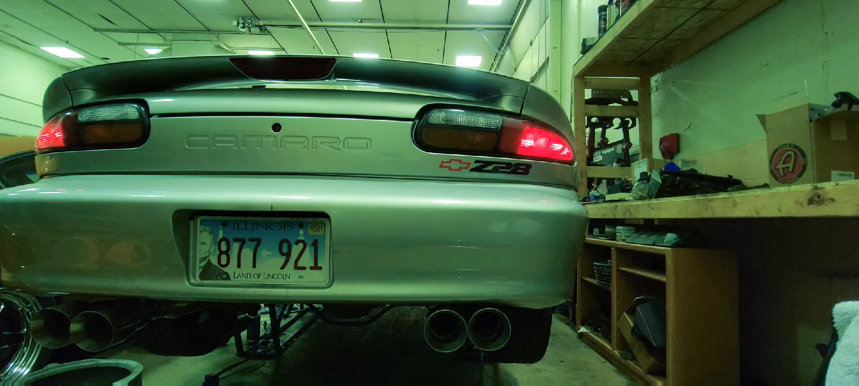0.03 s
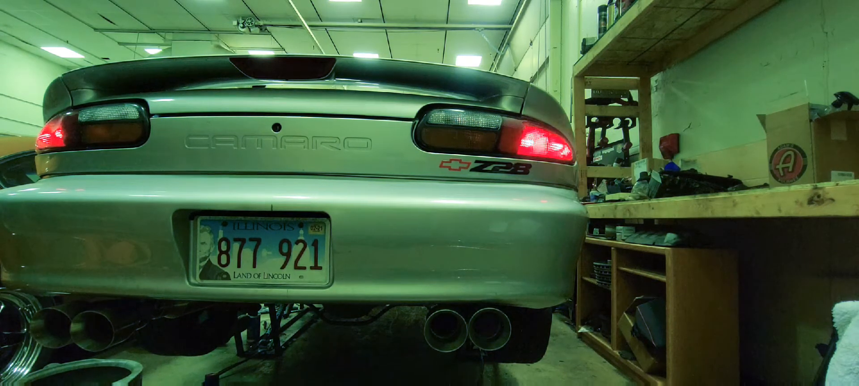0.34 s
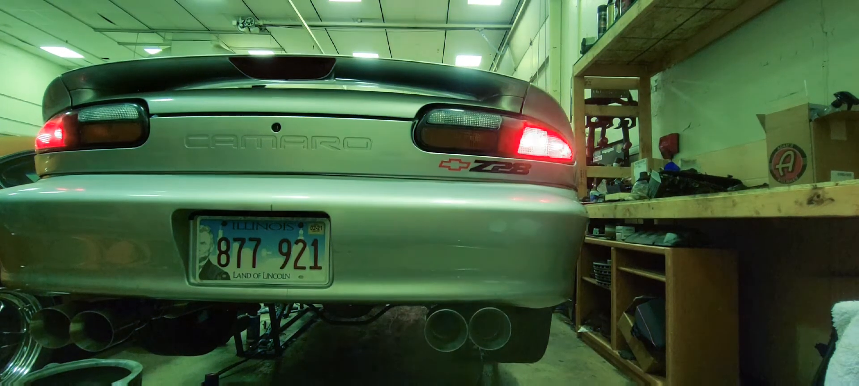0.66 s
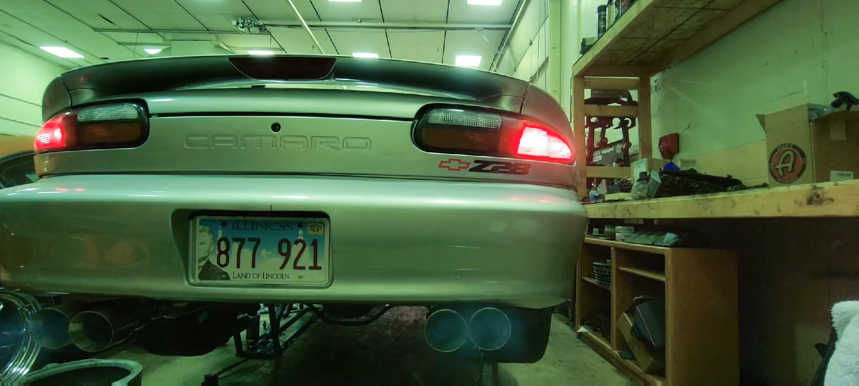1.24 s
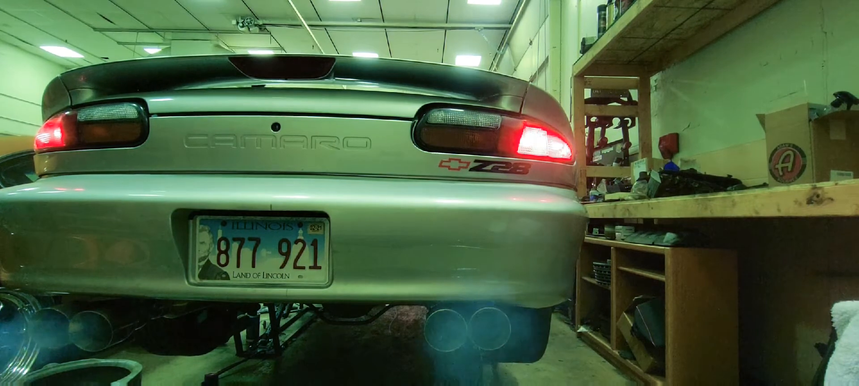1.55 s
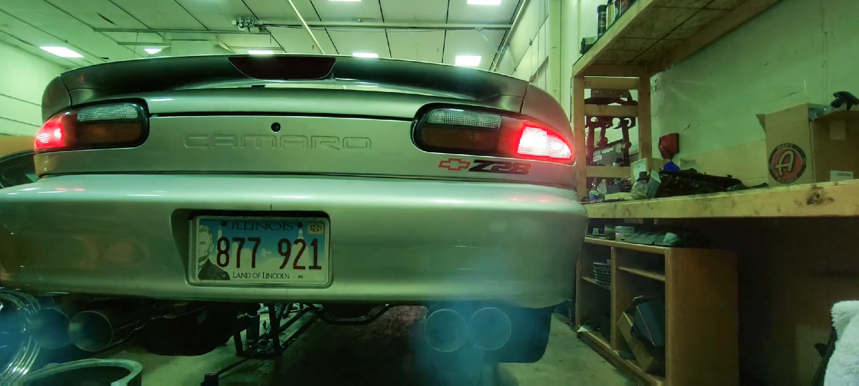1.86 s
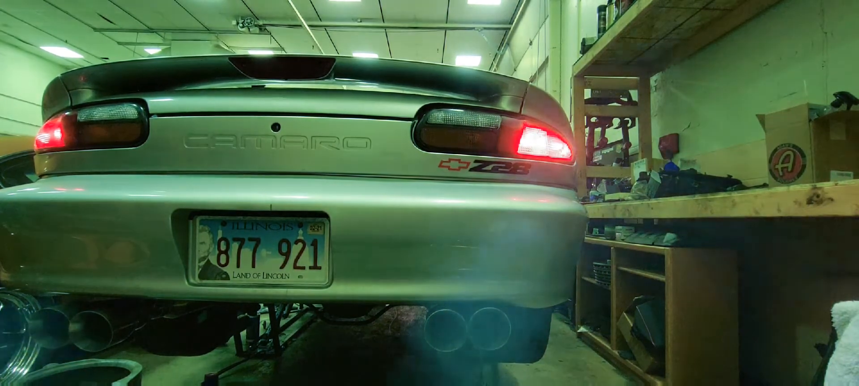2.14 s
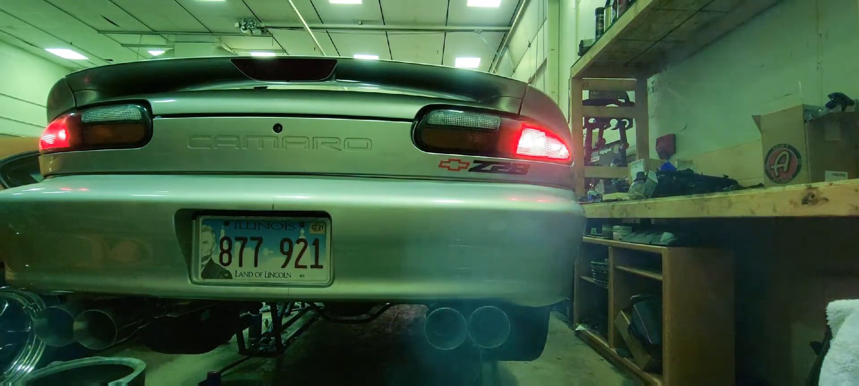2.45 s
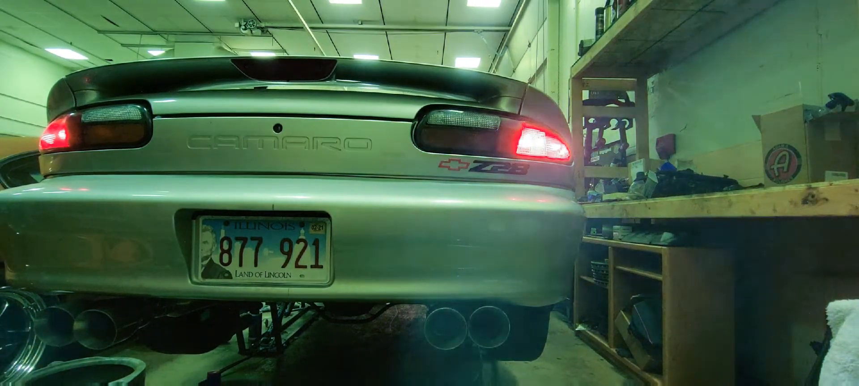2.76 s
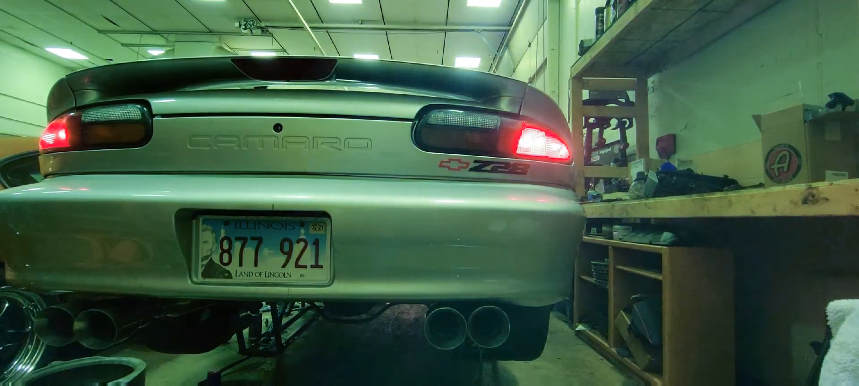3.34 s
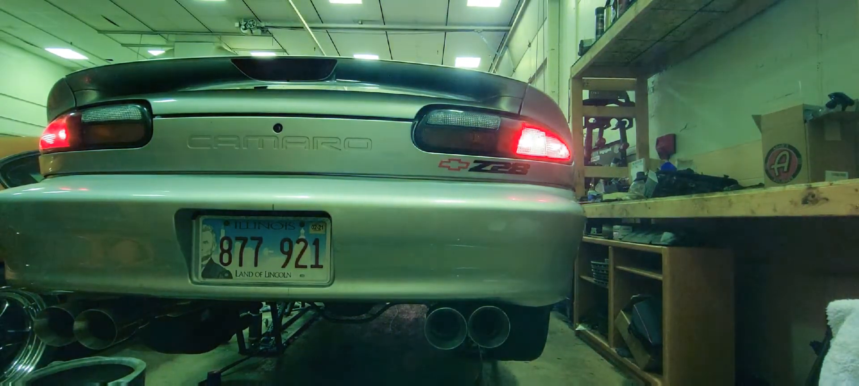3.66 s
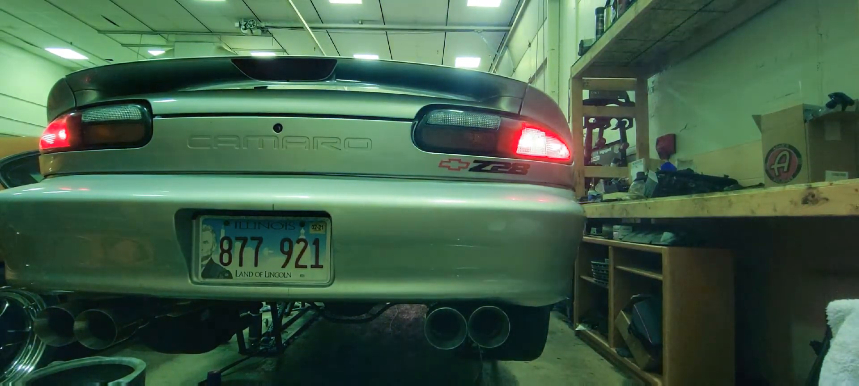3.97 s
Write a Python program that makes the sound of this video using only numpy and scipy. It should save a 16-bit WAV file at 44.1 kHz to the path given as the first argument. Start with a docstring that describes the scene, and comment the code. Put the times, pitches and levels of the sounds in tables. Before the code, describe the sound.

A V8 car engine starts: the starter grinds and knocks briefly, the engine catches with a thump and pops, revs up, then sinks to a lumpy idle. The microphone is just behind the tailpipes in a workshop.

```python
"""A V8 starting in a workshop, with a stereo microphone just behind its twin tailpipes.
The starter grinds and knocks; the engine catches with a thump, flares, sags and settles to a lumpy idle.
Each firing sends a pressure pulse and a puff of gas down the pipes, which boom, bark, rasp and hiss,
with a few pops, spits and thin chirps at the mouths. The room adds a short tail; the left is louder."""
import sys
import numpy as np
from scipy import signal
from scipy.fft import rfft, irfft, next_fast_len
from scipy.io import wavfile
from scipy.ndimage import uniform_filter1d, map_coordinates

SR = 44100
rng = np.random.default_rng(int(sys.argv[2]) if len(sys.argv) > 2 else 0)


def pcm_store(signal):
    """Save signal as 16-bit PCM."""
    levels = np.round(np.clip(np.atleast_2d(signal), -1, 1) * 32767)
    wavfile.write(sys.argv[1], SR, levels.astype(np.int16).T)


N = 176400

# engine speed, eight firings a cycle: time_s, cycle_rate_hz
ENGINE_SPEED = [(.4, 6.24), (.5, 11.2), (.6, 13.01), (.72, 16.22), (.86, 18.38), (1.02, 19.12),
                (1.16, 18.84), (1.4, 17.78), (1.6, 16.43), (1.76, 15.83), (1.88, 13.7), (2, 11.78),
                (2.12, 9.54), (2.28, 8.19), (2.45, 8), (2.65, 8.8), (2.87, 9.42), (3.06, 10.45),
                (3.3, 10.27), (3.6, 9.93), (4, 9.78)]
# cylinders in firing order: strength_db, late_ms
FIRING_ORDER = [(1, 1.05), (-3.6, .5), (1.3, .35), (0, 0), (-3.6, -1.55), (1.2, .65), (2, -.95), (2.5, .1)]
# level of the pipes' resonances: time_s, boom_db, bark_db
PIPE_LEVELS = [(.41, -16, -20.5), (.52, -7.5, -13), (.62, -13.5, -14), (.72, -13.5, -13),
               (.84, -18.5, -13.5), (1.1, -18.5, -14.5), (1.42, -19, -14), (1.57, -17, -16),
               (1.84, -15.5, -14.5), (1.98, -9.5, -18), (2.04, -12.5, -21), (2.09, -14, -19.5),
               (2.35, -17.5, -25), (2.5, -16, -23.5), (2.71, -13.5, -18), (3.1, -13.5, -20),
               (3.41, -14, -19), (4, -15.5, -18)]
# the pipes' long resonances, with dead notches between them: freq_hz, gain_db
BOOM_RESPONSE = [(12, -60), (30, -37), (42, -4), (52, -2.5), (64, -7.5), (80, -5.5), (96, 6.5), (108, 0.5),
                 (120, -14), (134, -5.5), (150, -18), (172, -27), (193, -12.5), (212, -20.5), (280, -54),
                 (1000, -100)]
# the tailpipes' ring: freq_hz, gain_db
BARK_RESPONSE = [(100, -68), (175, -37.5), (215, -17.5), (245, -12), (277, -5.5), (303, -12), (336, -3),
                 (356, -2.5), (379, 2), (402, -2.5), (435, -12), (470, -8), (500, -12), (528, -13),
                 (600, -23), (800, -36), (3000, -109)]
# level of the gas rushing from the mouths: time_s, rasp_db, hiss_db
GAS_LEVELS = [(.41, -32.5, -26.5), (.47, -22.5, -28), (.62, -23.5, -32), (.85, -28, -40), (1.2, -30, -41.5),
              (1.75, -31, -39.5), (1.89, -30, -34.5), (1.98, -33.5, -39.5), (2.35, -35, -39.5),
              (2.6, -27.5, -32.5), (2.8, -29.5, -32), (3.3, -29, -33), (4, -31, -34)]
# colour of that gas, low rasp and high hiss: freq_hz, density_db
RASP_SPECTRUM = [(300, 1.5), (560, -7), (650, -8), (740, 0.5), (860, 2), (1050, -4), (1320, -7.5),
                 (1650, -23), (2200, -23), (4000, -30)]
HISS_SPECTRUM = [(900, -22), (1900, -6.5), (2250, -31), (2650, -2.5), (3400, -12), (4600, 2), (5400, 0),
                 (6600, 6.5), (8300, -6), (11500, -8), (14000, 1), (16000, -6)]
# pops of the first firings, sharp spits, thin chirps at idle: start_s, level_db
POP_EVENTS = [(.427, -10), (.446, -9), (.478, -11), (.561, -17), (.593, -14.5), (.616, -12)]
SPIT_EVENTS = [(.404, -24), (0.451, -17), (1.4946, -31), (1.6081, -11)]
CHIRP_EVENTS = [(2.9, -36), (3.1, -32.5), (3.395, -36), (3.6, -32), (3.705, -35), (3.805, -33)]
# colour of each kind of gas burst: freq_hz, density_db
POP_SPECTRUM = [(250, -5), (600, -3.5), (900, -2.5), (1400, -11), (2000, -22), (5000, -45), (14000, -44)]
SPIT_SPECTRUM = [(30, 37), (300, 29.5), (1200, 18), (3000, -1), (6500, 2), (9000, -19), (15000, -10)]
CHIRP_SPECTRUM = [(7000, -39), (9300, -6), (10000, -1), (10800, -11), (13000, -9), (16000, -15)]
# the starter's grind and a low throb that peaks as the engine catches: time_s, grind_db, throb_db
START_LEVELS = [(0, -27.5, -54), (.05, -26.5, -31), (.165, -29, -45), (.185, -20, -40), (.235, -25, -28),
                (.315, -25, -30), (.335, -18.5, -30), (.395, -18, -23), (.43, -29, -7), (.48, -30.5, -20),
                (.6, -38, -57), (.75, -53, -75), (1.1, -80, -91)]
# colour of the grinding gears: freq_hz, density_db
GRIND_SPECTRUM = [(20, -27), (50, -4), (150, -20.5), (420, -11), (520, -11), (640, -17.5), (900, -12),
                  (1100, -13), (1350, -12), (1700, -19.5), (2100, -19.5), (2650, -14), (3400, -22.5),
                  (4200, -19.5), (4630, -24.5), (5200, -23.5), (6400, -20.5), (8400, -38), (15000, -51.5)]
# the starter housing's narrow rings: pitch_hz, half_width_hz, level_db
HOUSING_MODES = [(1304, 35, 1), (1480, 32, -12), (2530, 76, -2.5), (4690, 210, -4)]
# knocks of the starter drive: start_s, level_db
DRIVE_KNOCKS = [(0.061, -22), (0.179, -32), (0.325, -9)]
# the drive's ring after a knock: pitch_hz, level_db, t60_s
DRIVE_MODES = [(523, 2.5, 0.1), (534, -17, 0.11), (1456, -15, 0.077)]
# the workshop's decay: freq_hz, t60_s
ROOM_DECAY = [(100, 0.94), (500, 0.31), (3000, 0.18), (12000, 0.056)]
# room tail against direct sound at the microphone: freq_hz, level_db
ROOM_SHARE = [(100, -22), (190, -22), (370, -13), (700, -5), (3000, -4.5), (14000, -3)]
# left channel over right: freq_hz, difference_db
LEFT_OVER_RIGHT = [(60, .5), (130, .5), (300, 4.5), (600, 4.8), (1000, 3.5), (2000, 4.8), (8000, 6),
                   (13000, 1.8)]

CATCH_S, CATCH_FADE_S = .406, .0084
BARK_LEFT_LAG_S = .00032
COMPRESSION_HZ, THROB_HZ, MESH_HZ = 6.9, 59.97, 1365
WHINE_GAIN, WHINE_BEND, WHINE_SWELL_DB = .42, .0513, 1.5
HOUSING_DB = -5
TOP_HZ = 15800


def exhaust():
    """Firing pulses boom and bark in the pipes; their gas rasps and hisses at the mouths."""
    boom_db, bark_db = curves(PIPE_LEVELS)
    rasp_db, hiss_db = curves(GAS_LEVELS)
    running = np.clip((np.arange(N) / SR - CATCH_S) / CATCH_FADE_S + .5, 0, 1)
    thuds = pulses(uneven=1, stagger=1, scatter_db=.7, jitter=.02)
    boom = even(pipe(unit(thuds) + .14 * rng.standard_normal(N), BOOM_RESPONSE))
    fronts = pulses(uneven=1, stagger=1, scatter_db=1, jitter=.022)
    churn = unit(puffs(fronts, decay_s=.022, steady=.15) * rng.standard_normal(N))
    bark = even(pipe(unit(fronts) + .4 * churn, BARK_RESPONSE))
    delay_s = BARK_LEFT_LAG_S * np.array([[.5], [-.5]])
    bark = filtered(bark, lambda hz: np.exp(-2j * np.pi * hz * delay_s))
    rasp = puffs(fronts, decay_s=.003, steady=1) * noise(RASP_SPECTRUM)
    jets = pulses(uneven=.17, stagger=.45, scatter_db=4.5, jitter=.14)
    hiss = puffs(jets, decay_s=.0034, steady=1) * noise(HISS_SPECTRUM)
    pipes = amp(boom_db) * boom + amp(bark_db) * bark
    return running * (pipes + amp(rasp_db) * rasp + amp(hiss_db) * hiss)


def firings():
    """The cylinders fire in turn from the catch on: start_s, strength_db, late_s of each firing."""
    cycle_hz, = curves(ENGINE_SPEED)
    t = np.arange(N) / SR
    count = np.cumsum(cycle_hz) * len(FIRING_ORDER) / SR
    count -= np.interp(CATCH_S, t, count)
    firing = np.arange(int(count[-1]))
    strength_db, late_ms = np.array(FIRING_ORDER)[firing % len(FIRING_ORDER)].T
    return np.interp(firing, count, t), strength_db, late_ms / 1000


def pulses(uneven, stagger, scatter_db, jitter):
    """One pressure pulse a firing; uneven and stagger scale each cylinder's strength and lateness."""
    start_s, strength_db, late_s = firings()
    slip, scatter = rng.standard_normal((N // 100, 2))[:len(start_s)].T
    interval_s = np.gradient(start_s)
    arrival_s = start_s + stagger * late_s + jitter * interval_s * slip
    at = np.clip(arrival_s * SR, 0, N).astype(int)
    return np.bincount(at, amp(uneven * strength_db + scatter_db * scatter), N + 1)[:N]


def pipe(x, colour):
    """A pipe rings after each push: a minimum-phase filter through the freq_hz, gain_db points."""
    def response(hz):
        cepstrum = irfft(np.log(amp(along(colour, hz))), 2 * len(hz) - 2)
        cepstrum[1:len(hz) - 1] *= 2
        cepstrum[len(hz):] = 0
        return np.exp(rfft(cepstrum))
    return filtered(x, response)


def puffs(train, decay_s, steady):
    """Gas flow: a dying puff after each pulse, on a steady stream."""
    t = np.arange(SR // 20) / SR
    puff = np.exp(-t / decay_s) - np.exp(-2 * t / decay_s)
    flow = signal.fftconvolve(train, puff)[:N]
    return even(even(flow) + steady)


def gas_bursts(events, spectrum, t60_s):
    """Gas bursts from the pipe mouths, starting sharply and dying fast."""
    t = np.arange(N) / SR
    envelope = sum((t >= s) * amp(db - 60 * abs(t - s) / t60_s) for s, db in events)
    return noise(spectrum) * envelope


def starter():
    """Gears grind, ring the housing and whine, bending with each compression, over a low throb."""
    def housing(hz):
        return sum(amp(db) / (1 + ((hz - pitch) / width) ** 2) for pitch, width, db in HOUSING_MODES)
    grind_db, throb_db = curves(START_LEVELS)
    stroke = np.sin(2 * np.pi * COMPRESSION_HZ * np.arange(N) / SR)
    mesh_hz = MESH_HZ * (1 + WHINE_BEND * stroke + .008 * wobble(60))
    mesh_phase = 2 * np.pi * np.cumsum(mesh_hz) / SR
    whine = WHINE_GAIN * amp(WHINE_SWELL_DB * stroke) * (np.sin(mesh_phase) + np.sin(2 * mesh_phase))
    rings = amp(HOUSING_DB) * unit(filtered(rng.standard_normal((2, N)), housing))
    grind = unit((noise(GRIND_SPECTRUM) + whine + rings) * amp(1.8 * wobble(220)))
    # a low chug while cranking, then the heavy thump of the first firings as the engine catches
    throb_phase = 2 * np.pi * np.cumsum(THROB_HZ * (1 + .25 * wobble(47.6))) / SR
    throb = unit(np.sin(throb_phase) * amp(.94 * wobble(42.8)))
    return amp(grind_db) * grind + amp(throb_db) * throb


def drive_knocks():
    """The starter drive rings each time it takes up the load."""
    knocks = np.zeros(N)
    for start_s, level_db in DRIVE_KNOCKS:
        t = np.maximum(np.arange(N) / SR - start_s, 0)
        attack = 1 - np.exp(-t / .0043)
        ring = sum(amp(db - 60 * t / t60) * np.sin(2 * np.pi * hz * t) for hz, db, t60 in DRIVE_MODES)
        knocks += amp(level_db) * attack * ring
    return knocks


def workshop(direct):
    """The direct sound reaches the microphone with a short room tail, different in each channel."""
    hz, t, frames = signal.stft(rng.standard_normal((2, SR // 2)), SR, nperseg=256)
    decay = amp(-60 * t / along(ROOM_DECAY, hz)[:, None])
    tail = signal.istft(frames * decay, SR, nperseg=256)[1]
    room = signal.fftconvolve(direct, tail / np.linalg.norm(tail[0]), axes=1)[:, :N]
    wet = lambda f: amp(along(ROOM_SHARE, f))
    return filtered(direct + filtered(room, wet), lambda f: 1 / np.hypot(1, wet(f)))  # same total power


def amp(db):
    """Decibels to gain."""
    return 10 ** (np.asarray(db) / 20)


def unit(x):
    """x at rms 1."""
    return x / np.sqrt(np.mean(x ** 2) + 1e-20)


def even(x, size=7000):
    """x with its slow level held near rms 1; single beats keep their shape."""
    power = uniform_filter1d(uniform_filter1d(x ** 2, size), size // 2)
    return x / np.sqrt(abs(power) + .02 * np.mean(x ** 2))


def along(points, hz):
    """A table's value at hz, on a log frequency axis."""
    freq_hz, values = np.transpose(points)
    return np.interp(np.log(hz + 1), np.log(freq_hz + 1), values)


def curves(rows):
    """One value per sample for each column after time_s."""
    time_s, *columns = np.transpose(rows)
    return [np.interp(np.arange(N) / SR, time_s, column) for column in columns]


def wobble(rate_hz):
    """A smooth random curve, rate_hz knots a second."""
    knots = rng.standard_normal(int(N * rate_hz / SR) + 4)
    return map_coordinates(knots, [np.arange(N) * rate_hz / SR])


def filtered(x, response):
    """x through a complex response of frequency."""
    size = next_fast_len(N + SR // 2)
    return irfft(rfft(x, size) * response(np.fft.rfftfreq(size, 1 / SR)), size)[..., :N]


def noise(spectrum):
    """Wide stereo noise of this colour, mid and side each near rms 1."""
    mid, side = unit(filtered(rng.standard_normal((2, N)), lambda hz: amp(along(spectrum, hz))))
    return np.array([mid + side, mid - side])


def scene():
    """The car in the workshop from just behind the tailpipes, louder on the left."""
    gas = gas_bursts(POP_EVENTS, POP_SPECTRUM, t60_s=.04)
    gas += gas_bursts(SPIT_EVENTS, SPIT_SPECTRUM, t60_s=.0081)
    gas += gas_bursts(CHIRP_EVENTS, CHIRP_SPECTRUM, t60_s=.13)
    at_mic = workshop(exhaust() + starter() + drive_knocks() + gas)
    return filtered(at_mic, lambda hz: amp(along(LEFT_OVER_RIGHT, hz) * np.array([[.5], [-.5]])))


def record(dry):
    """The highest peaks are rounded off at full scale; nothing passes above TOP_HZ."""
    rounded = dry / (1 + abs(dry) ** 8) ** (1 / 8)
    return filtered(rounded, lambda hz: hz < TOP_HZ)


dry = scene()
out = record(dry)
pcm_store(out)
```